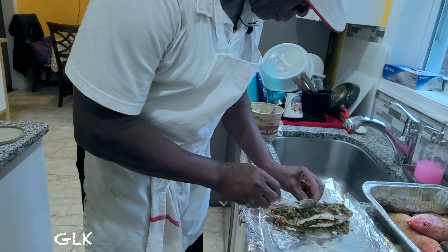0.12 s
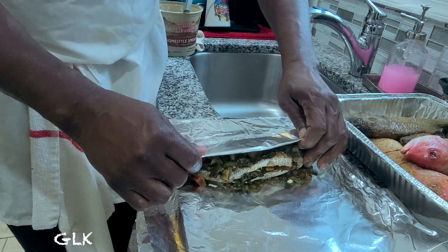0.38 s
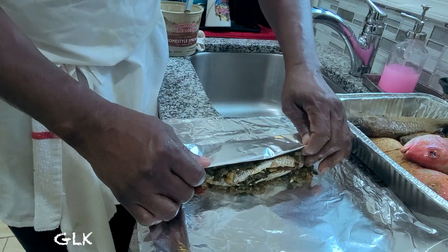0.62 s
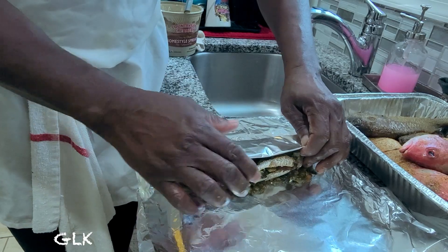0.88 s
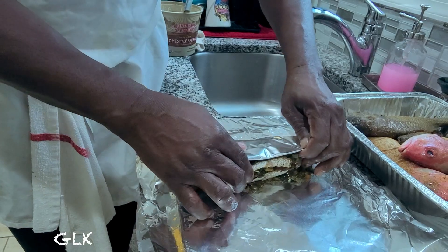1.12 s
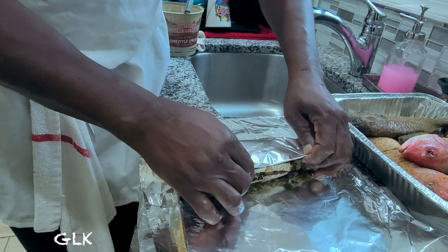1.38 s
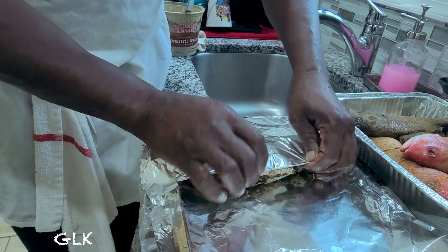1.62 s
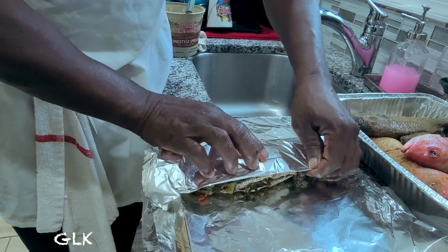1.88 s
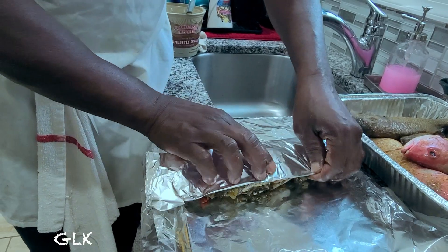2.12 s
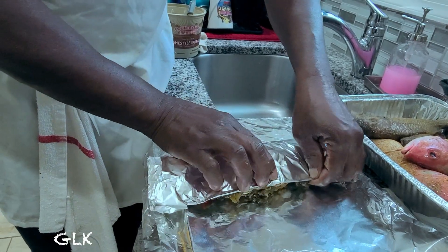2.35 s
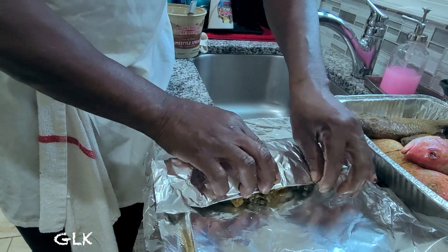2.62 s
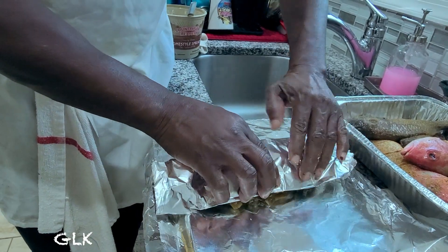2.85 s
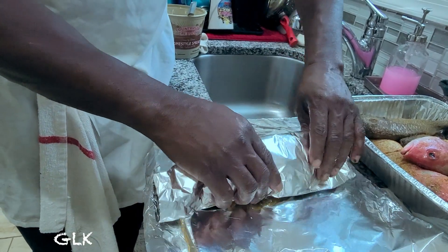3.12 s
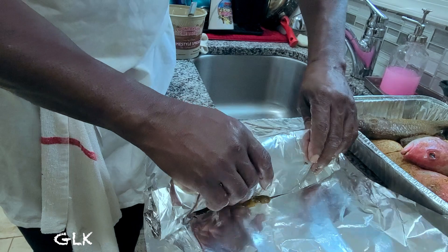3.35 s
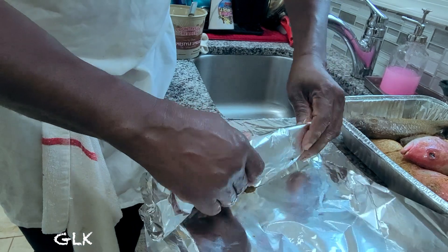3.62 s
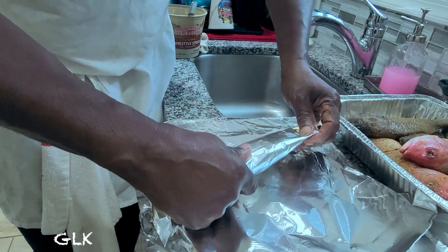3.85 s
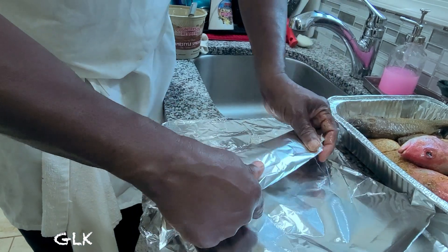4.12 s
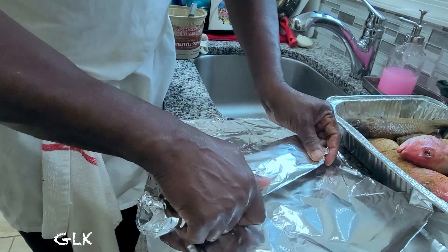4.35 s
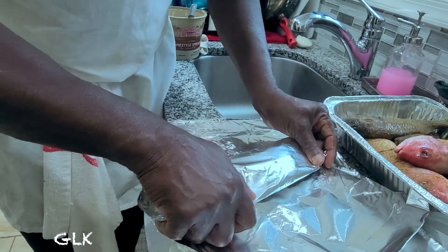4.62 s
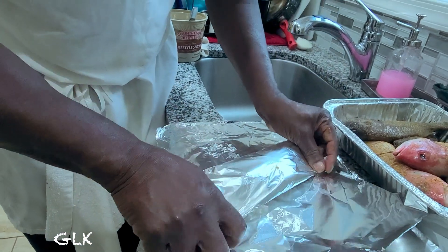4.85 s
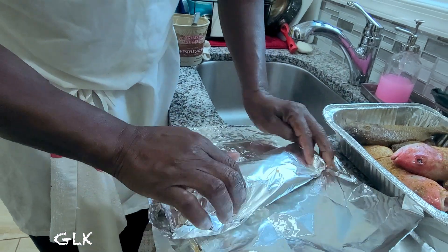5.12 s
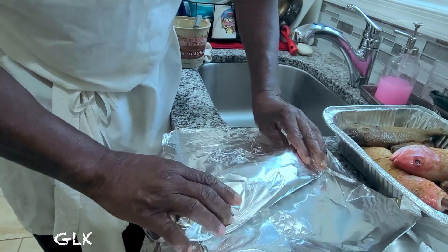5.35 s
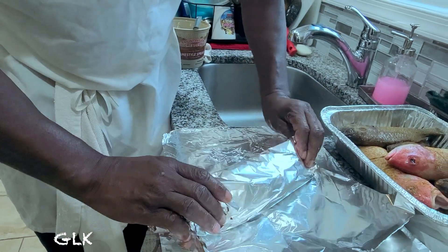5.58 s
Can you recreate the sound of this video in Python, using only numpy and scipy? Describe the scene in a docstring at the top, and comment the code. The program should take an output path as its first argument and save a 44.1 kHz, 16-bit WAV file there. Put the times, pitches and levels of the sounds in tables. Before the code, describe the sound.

Close, dry foil crumpling: scattered snaps and small pops at first, then loud bright rushes of crackle in a small hard-walled kitchen.

```python
"""Wrapping food in foil

Hands fold and press aluminium foil round food on a kitchen counter, close to a pair of microphones.
Creases buckle as sharp bursts of noise, panels and dents pop as short fading tones,
and swarms of random tiny creases hiss between them. The parcel thuds on the counter as low fading tones;
an appliance hums over rumbling noise, and the hard walls answer with short tails of noise.
"""
import sys
import numpy as np
from scipy import signal
from scipy.fft import rfft, irfft, next_fast_len
from scipy.io import wavfile
from scipy.ndimage import uniform_filter1d, map_coordinates

SR = 44100
rng = np.random.default_rng(int(sys.argv[2]) if len(sys.argv) > 2 else 0)


def convert_level_to_amplitude(level_db):
    """Map a level in decibels to its linear amplitude factor."""
    exponent = np.asarray(level_db, float) / 20
    return 10 ** exponent


def wav_record(signal):
    """Record a signal, one row per channel, as 16-bit PCM in the file named by sys.argv[1]."""
    frames = np.transpose(np.atleast_2d(signal))
    bounded = np.clip(frames, -1, 1)
    # unit amplitude maps onto the largest positive 16-bit level
    quanta = np.round(bounded * 32767).astype(np.int16)
    wavfile.write(sys.argv[1], SR, quanta)


N = 252372  # length in samples

# Colour of the room's rumble. Each row: frequency in Hz, relative level in dB per Hz.
ROOM_COLOUR = [(30, -11.5), (42, 6), (54, -6), (80, -6.5), (230, -14), (295, -14.5), (400, -21),
               (650, -28.5), (1100, -39), (3200, -49.5), (16000, -53.5)]
# Appliance hum. Each row: frequency in Hz, middle level in dB rms.
HUM_TONES = [(120, -62)]
# How alike left and right are. Each row: frequency in Hz, likeness from 0 (unrelated) to 1 (the same).
LIKENESS = [(40, 1), (250, 0.89), (500, 0.74), (1000, 0.51), (3000, 0.0061)]
# Ring of the small hard thing. Each row: frequency in Hz, relative level in dB, time to fall 60 dB in seconds.
TICK_PARTS = [(2770, -3, 0.21), (4400, -2, 0.11), (5200, 4, 0.041)]
# How long the walls answer. Each row: frequency in Hz, time to fall 60 dB in seconds.
WALL_DECAY = [(300, 0.14), (2000, 0.16), (12000, 0.051)]
# How hard the hands work the sheet. Each row: time in seconds, effort in dB.
HAND_EFFORT = [(0.42, -53.5), (0.6, -65), (0.74, -56), (0.79, -102), (0.938, -77), (0.945, -53.5),
               (1.0, -59), (1.13, -51.5), (2.36, -52.5), (2.395, -78), (2.47, -68.5), (2.9, -51),
               (3.19, -34.5), (3.5, -70), (3.6, -48), (4.13, -35), (4.4, -44.5), (4.52, -39), (4.595, -46),
               (4.63, -38), (4.82, -34.5), (5.1, -46), (5.5, -49), (5.72, -35)]
# Times when the steady work stops. Each row: start in seconds, end in seconds.
HAND_RESTS = [(0, 0.418), (0.79, 0.92)]
# Quick squeezes that crumple a whole fold. Each row: middle in seconds, half length in seconds, effort in dB.
QUICK_SQUEEZES = [(0.127, 0.0079, -64.5), (0.508, 0.0054, -33.5), (0.706, 0.033, -50), (1.01, 0.011, -30),
                  (1.037, 0.019, -33), (1.122, 0.017, -30.5), (1.177, 0.017, -34.5), (1.855, 0.018, -30),
                  (2.594, 0.08, -41), (3.26, 0.069, -33), (3.409, 0.027, -26.5), (3.492, 0.061, -30),
                  (3.704, 0.041, -28.5), (3.814, 0.04, -27), (4.112, 0.017, -32), (4.306, 0.011, -29),
                  (4.747, 0.04, -29.5), (4.845, 0.014, -32.5), (5.011, 0.026, -34.5), (5.231, 0.029, -31.5),
                  (5.354, 0.052, -35), (5.435, 0.025, -28.5), (5.621, 0.048, -39)]
# Colour of the sharpest creases. Each row: frequency in Hz, relative level in dB per Hz.
CRACK_COLOUR = [(1000, -23), (4000, -12.5), (9000, -7.5), (16000, -7.5)]
# Colour of the shivering sheet. Each row: frequency in Hz, relative level in dB per Hz.
SHIVER_COLOUR = [(500, -13.5), (1500, -3), (3000, 1.5), (6000, 4), (11500, 3.5), (13500, -0.5), (16000, -6)]
# Colour of the bending panels. Each row: frequency in Hz, relative level in dB per Hz.
PANEL_COLOUR = [(200, -92), (400, -7), (830, -9), (1150, -3.5), (1600, -6.5), (2100, -1), (3200, -5),
                (6000, -13.5)]
# Flat panels that pop with a pitch. Each row: start in seconds, relative level in dB, pitch in Hz.
PANEL_POPS = [(0.421, -27.5, 2210), (0.452, -33.5, 1050), (0.73, -30, 655), (0.944, -36, 1060),
              (0.973, -34.5, 1100), (1.22, -22.5, 1220), (1.541, -28.5, 675), (2.068, -33.5, 1170),
              (2.172, -27, 1090), (2.18, -25.5, 1230), (2.242, -27, 1240), (2.278, -25.5, 1700),
              (2.333, -31, 1850), (2.367, -29, 1310), (2.471, -29, 2120), (2.565, -27, 1140),
              (2.617, -22, 2520), (2.656, -24, 1410), (3.066, -21.5, 2000), (3.32, -22.5, 1230),
              (3.582, -16, 1270), (3.907, -24.5, 1240), (4.433, -28, 1000), (4.581, -24.5, 2360),
              (4.607, -26, 1200), (4.687, -27, 600), (4.949, -23, 894), (5.164, -24.5, 1260)]
# Creases that snap on their own. Each row: start in seconds, relative level in dB.
SINGLE_SNAPS = [(0.424, -36), (0.453, -30.5), (0.5, -36), (0.536, -28.5), (0.559, -21), (0.5908, -29),
                (0.656, -32), (0.998, -27), (1.005, -20), (1.105, -36), (1.169, -27), (1.308, -28.5),
                (1.317, -24.5), (1.347, -24.5), (1.43, -28.5), (1.4765, -27.5), (1.542, -30.5),
                (1.577, -26), (1.678, -31.5), (1.8268, -33), (1.86, -31), (1.906, -20), (2.037, -29.5),
                (2.088, -26.5), (2.177, -29.5), (2.238, -36), (2.2417, -23.5), (2.266, -39), (2.501, -25.5),
                (2.5657, -24.5), (2.5907, -28), (2.6165, -33), (2.763, -26.5), (2.933, -31), (3.072, -28.5),
                (3.183, -17), (3.751, -12), (3.794, -16.5), (3.917, -20.5), (4.105, -14.5), (4.234, -22),
                (4.4087, -24.5), (4.475, -32), (4.607, -27.5), (4.745, -14), (4.779, -15.5), (5.163, -27),
                (5.332, -27), (5.5787, -36)]
# Small dry creases that flick over and stop at once. Each row: start in seconds, relative level in dB.
DRY_FLICKS = [(0.487, -41), (1.383, -35), (1.7248, -42), (2.107, -44), (2.1365, -36), (2.1626, -32.5),
              (2.2917, -34), (2.3146, -37), (2.46, -40), (2.799, -43), (2.8855, -30.5), (3.0425, -37),
              (3.6105, -38), (4.485, -33), (4.562, -37), (4.5825, -44), (5.127, -37)]
# Loose panels that flutter. Each row: start in seconds, length in seconds, middle level in relative dB,
# middle pitch in Hz.
PANEL_RATTLES = [(4.021, 0.03, -25, 1230), (4.071, 0.026, -28.5, 1330), (4.679, 0.021, -25, 1850),
                 (5.194, 0.045, -23, 2370), (5.597, 0.055, -24, 2140)]
# Knocks on the counter. Each row: start in seconds, level before rise and decay in dB, pitch in Hz.
COUNTER_THUDS = [(0.703, -38.5, 405), (4.367, -38.5, 133), (4.434, -38.5, 122)]
# Left microphone against right. Each row: frequency in Hz, left over right in dB.
MIC_BALANCE = [(300, -2), (1000, 0), (4000, 0.5)]


def unit(x):
    """Scales x to an average strength (rms) of 1."""
    return x / np.sqrt(np.mean(x ** 2) + 1e-20)


def along(points, hz):
    """Reads a table of frequencies and values, with frequency on a log scale."""
    f, v = np.transpose(points)
    return np.interp(np.log(hz + 1), np.log(f + 1), v)


def filtered(x, response):
    """Multiplies the spectrum of x by a response that depends on frequency."""
    m = next_fast_len(N + 8192)
    return irfft(rfft(x, m) * response(np.fft.rfftfreq(m, 1 / SR)), m)[..., :N]


def rush(spectrum, patchy_db):
    """Stereo noise of rms 1 whose colour shifts in random patches, alike in the bass, unrelated in the treble."""
    z = signal.stft(rng.standard_normal((2, N)), nperseg=256)[2]
    field = uniform_filter1d(rng.standard_normal(z.shape[1:]), size=5, axis=0)
    field = uniform_filter1d(field, size=6, axis=1)
    pair = signal.istft(z * convert_level_to_amplitude(patchy_db * unit(field)), nperseg=256)[1][:, :N]

    def mid_and_side(hz):
        angle = np.arccos(np.clip(along(LIKENESS, hz), -1, 1)) / 2
        return convert_level_to_amplitude(along(spectrum, hz)) * [np.cos(angle), np.sin(angle)]

    mid, side = filtered(pair, mid_and_side)
    return unit(np.array([mid + side, mid - side]))


def room_tone():
    """Low rumble of coloured noise, with an appliance hum slightly unsteady in level and phase."""
    t = np.arange(N) / SR
    waver = map_coordinates(rng.standard_normal(N // 2000 + 4), [np.arange(N) / 2000])
    hum = np.zeros(N)
    for hz, db in HUM_TONES:
        hum += np.sqrt(2) * convert_level_to_amplitude(db + 1.5 * waver) * np.sin(2 * np.pi * hz * t + 0.75 * waver)
    return convert_level_to_amplitude(-53.0) * rush(ROOM_COLOUR, patchy_db=0.5) + hum


def noise_band(hz, width_hz):
    """Stereo noise of rms 1 in a narrow band, which sounds like a blurred tone."""
    noise = rng.standard_normal((2, N))
    return unit(filtered(noise, lambda f: np.exp(-((f - hz) / width_hz) ** 2)))


def tick():
    """Something small and hard is touched and rings; a fingertip's slide then grows until the folding starts."""
    tick_s, slide_s = 0.122, 0.21
    now, folding_s = np.arange(N) / SR, HAND_RESTS[0][1]
    t = np.maximum(now - tick_s, 0)
    ring = sum(convert_level_to_amplitude(db - 60 * t / t60) * noise_band(hz, 0.054 * hz) for hz, db, t60 in TICK_PARTS)
    ring = ring * (1 - np.exp(-t / 0.0017))
    growth = np.clip((now - slide_s) / (folding_s - slide_s), 0, 1) * (now < folding_s)
    # soft narrow hiss, weaker in the higher bands
    hiss = sum(noise_band(hz, 0.12 * hz) * 2160 / hz for hz in (2160, 7600, 11100))
    return convert_level_to_amplitude(-63.5) * ring + convert_level_to_amplitude(-75.5) * growth * hiss


def walls(x):
    """Hard walls answer with fading noise, each frequency at its own speed; ten answers take steady turns."""
    noise = rng.standard_normal((10, 1, SR // 3))
    hz, t, z = signal.stft(noise, SR, nperseg=256)
    fade = convert_level_to_amplitude(-60 * t / along(WALL_DECAY, hz)[:, None])
    tails = signal.istft(z * fade, SR, nperseg=256)[1]
    turn = np.pi * (1.3 * np.arange(N) / SR + np.arange(len(tails))[:, None] / len(tails))
    shares = np.cos(turn)[:, None] ** 24
    wet = signal.fftconvolve(x * shares, tails / np.linalg.norm(tails[0, 0]), axes=2)
    return wet.sum(0)[:, :N]


def effort():
    """Power of fine creases and wide panels: one effort drives both, and squeezes add short swells."""
    now = np.arange(N) / SR
    fine_db = np.interp(now, *np.transpose(HAND_EFFORT))
    wide_db = -45 + 0.45 * (fine_db + 44.0)  # panels grow more slowly than fine creases
    power = convert_level_to_amplitude(2 * np.array([fine_db, wide_db]))
    for start, end in HAND_RESTS:
        power[:, (now >= start) & (now < end)] = 0
    for s, half, db in QUICK_SQUEEZES:
        levels_db = np.array([[db], [db - 9.5]])  # a squeeze crumples more than it bends
        power += convert_level_to_amplitude(2 * levels_db) * np.exp(-((now - s) / half) ** 2)
    return power


def random_times(when, rate):
    """Sample numbers of events at random, on average rate of them per second."""
    return np.cumsum(-np.log(1 - when)) / rate * SR


def swarm(power, rate, spread_db, dense_db, count):
    """Random buckles of uneven size follow the power; above dense_db they overlap into an even rush."""
    when, chance = rng.random((count, 2)).T
    at = np.minimum(random_times(when, rate), N).astype(int)
    sizes = convert_level_to_amplitude(-2 * spread_db * np.log(1 - .96 * chance))
    train = np.bincount(at, sizes, N + 1)[:N]
    apart = 1 / (1 + power / convert_level_to_amplitude(2 * dense_db))
    return power * (apart * train / train.mean() + 1 - apart)


def dents(power, rate, centre_hz, spread, cycles, spread_db, count):
    """Small dents pop at random with their own pitch and place, as loud as the hands work."""
    when, chance, turn = rng.random((count, 3)).T
    pitch, pan = rng.standard_normal((count, 2)).T
    at = np.minimum(random_times(when, rate), N - 1).astype(int)
    hz = np.clip(centre_hz * np.exp(spread * pitch), 480, 9000)[:, None]
    k = np.arange(300)  # samples in one pop
    size = np.sqrt(power[at]) * convert_level_to_amplitude(-spread_db * np.log(1 - .97 * chance))
    life = size[:, None] * convert_level_to_amplitude(-60 * k / SR * hz / cycles) * np.minimum(k / 12, 1)
    places = (at[:, None] + k).ravel()
    out = []
    for side in (1, -1):
        # the ears get opposite shifts in phase and level
        phase = side * (turn[:, None] - .5) * np.pi * hz / centre_hz
        tone = life * np.sin(2 * np.pi * hz * k / SR + phase) * convert_level_to_amplitude(side * 2 * pan[:, None])
        out.append(np.bincount(places, tone.ravel(), N)[:N])
    return np.array(out)


def shiver(power, t60):
    """Loudness of a sheet that shakes at once and dies away by 60 dB in t60 seconds; powers add."""
    keep = convert_level_to_amplitude(-120 / (t60 * SR))
    return np.sqrt(np.abs(signal.lfilter([1 - keep], [1, -keep], power)))


def impulses(rows):
    """Power of single events, one sample each, from rows that begin with time and level."""
    train = np.zeros(N)
    for s, db, *_ in rows:
        train[round(s * SR)] += convert_level_to_amplitude(2 * db)
    return train


def pops():
    """Popping panels sound as a few close tones that die within a dozen or two cycles."""
    out, t = np.zeros((2, N + SR)), np.arange(SR // 20) / SR
    for s, db, hz in PANEL_POPS + rattles():
        # a dented panel has three neighbours in pitch
        near = hz * np.exp(rng.normal(0.2, 0.256, (4, 1)) * [[0], [1], [1], [1]])
        phase = rng.normal(0, 0.65, (2, 4, 1))
        ring = np.sin(2 * np.pi * near * t + phase) * convert_level_to_amplitude(-60 * t * near / 16)
        ring[:, 1:] *= convert_level_to_amplitude(-1.0)  # the neighbours are weaker
        ring = ring.sum(1) * (1 - np.exp(-t / 0.00041))
        out[:, round(s * SR):][:, :len(t)] += convert_level_to_amplitude(db - 3.0) * ring / np.abs(ring).max()
    return out[:, :N]


def snaps():
    """Power of the snapping creases, each spread over the same few milliseconds."""
    spread_s = 0.0046
    return shiver(impulses(SINGLE_SNAPS), spread_s) ** 2


def first_clicks():
    """Power of the click at the start of snaps and pops; capped, so loud snaps begin with relatively less."""
    snap_clicks = np.minimum(impulses(SINGLE_SNAPS), convert_level_to_amplitude(2 * -25))  # only snaps are capped
    pop_clicks = convert_level_to_amplitude(2 * -24) * impulses(PANEL_POPS)
    return snap_clicks + pop_clicks


def flicks():
    """Loudness of small dry creases that flick over and stop at once."""
    return convert_level_to_amplitude(19.5) * shiver(shiver(impulses(DRY_FLICKS), 0.003) ** 2, 0.005)


def rattles():
    """Loose panels flutter: each run holds six pops, uneven in time, level and pitch."""
    count, runs = 6, []
    for s, length, db, hz in PANEL_RATTLES:
        for k in range(count):
            late = rng.random() * (k > 0)  # the first pop is on time
            start = s + length * (k + late) / count
            runs.append((start, db + rng.normal(0, 3), hz * np.exp(rng.normal(0, 0.12))))
    return runs


def foil():
    """Swarms follow the hands; a crease cracks first and brightest, then the sheet around it shivers."""
    fine_power, wide_power = effort()
    ticks = swarm(fine_power, rate=350, spread_db=8.0, dense_db=-30, count=2400)
    fine = swarm(fine_power, rate=140, spread_db=4.0, dense_db=-37.5, count=4000)
    wide = swarm(wide_power, rate=270, spread_db=-1.5, dense_db=-31.0, count=3000)
    small = dents(wide_power, rate=320, centre_hz=1617, spread=0.4, cycles=13.6, spread_db=3.5, count=2200)
    single = snaps()

    click_level = np.hypot(convert_level_to_amplitude(11.5) * shiver(first_clicks(), 0.0062), convert_level_to_amplitude(-8.5) * shiver(ticks, 0.0018))
    clicks = (click_level + flicks()) * rush(CRACK_COLOUR, patchy_db=2.5)
    crack_level = np.hypot(convert_level_to_amplitude(16.0) * shiver(single, 0.038), convert_level_to_amplitude(-6.0) * shiver(ticks, 0.0062))
    cracks = crack_level * rush(CRACK_COLOUR, patchy_db=6.0)
    shiver_level = np.hypot(convert_level_to_amplitude(12.0) * shiver(single, 0.17), convert_level_to_amplitude(-2.0) * shiver(fine, 0.047))
    shivers = shiver_level * rush(SHIVER_COLOUR, patchy_db=1.5)
    panel_level = np.hypot(convert_level_to_amplitude(5) * shiver(single, 0.084), shiver(wide, 0.037))
    panels = panel_level * rush(PANEL_COLOUR, patchy_db=2.5)
    return clicks + cracks + shivers + panels + small + pops()


def thuds():
    """The parcel knocks softly on the counter, which booms as a tone that dies within 30 cycles."""
    out, t = np.zeros(N + SR), np.arange(SR // 2) / SR
    for s, db, hz in COUNTER_THUDS:
        boom = convert_level_to_amplitude(db - 60 * t * hz / 30) * np.sin(2 * np.pi * hz * t)
        out[round(s * SR):][:len(t)] += boom * (1 - np.exp(-t / 0.0041))
    return out[:N]


def scene():
    """Foil, thuds and tick with the walls' answer, over the room tone."""
    near = foil() + thuds() + tick()
    return near + convert_level_to_amplitude(-10.5) * walls(near) + room_tone()


def low_pass(x):
    """Removes everything above the highest recorded frequency."""
    return signal.sosfilt(signal.butter(12, 16970, fs=SR, output="sos"), x)


def record(dry):
    """The two microphones differ a little in colour; nothing is kept above the band limit."""
    top_hz, edge_hz = 15770, 80  # the treble fades out over the last edge_hz

    def tint(hz):
        balance = convert_level_to_amplitude(np.outer([.5, -.5], along(MIC_BALANCE, hz)))
        return balance * np.clip((top_hz - hz) / edge_hz, 0, 1)

    return low_pass(filtered(dry, tint))


dry = scene()
out = record(dry)
wav_record(out)
```